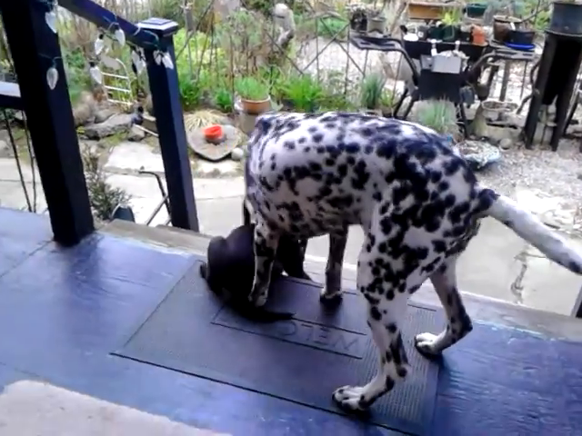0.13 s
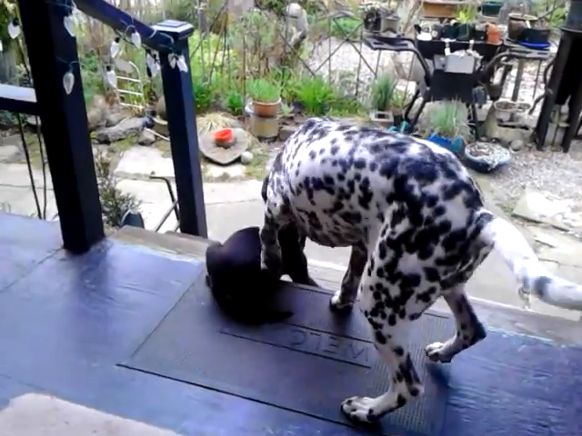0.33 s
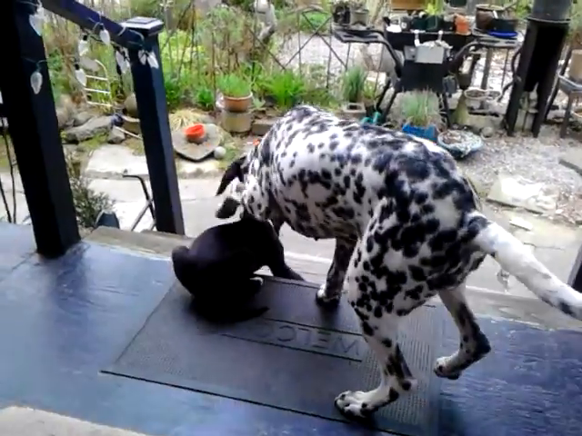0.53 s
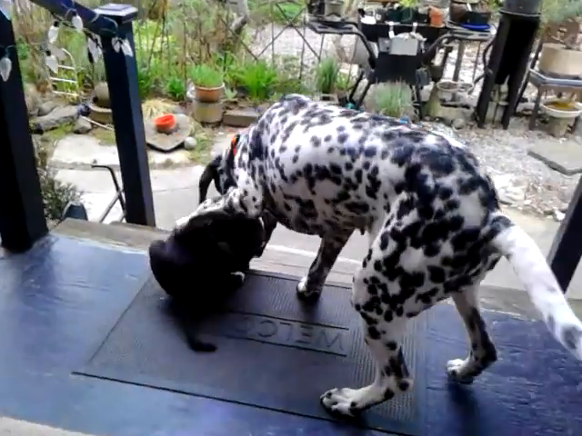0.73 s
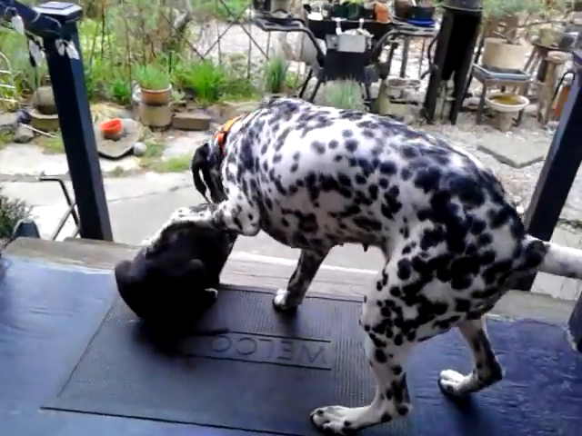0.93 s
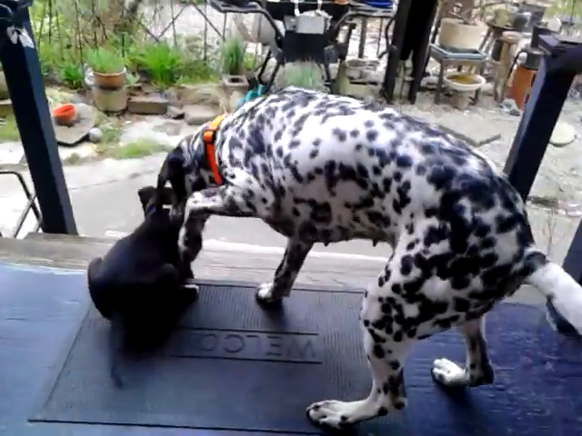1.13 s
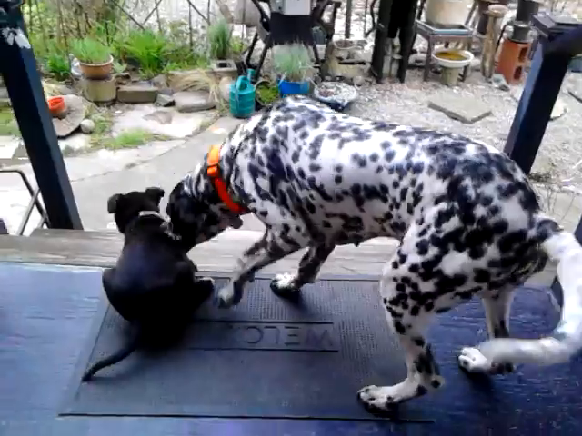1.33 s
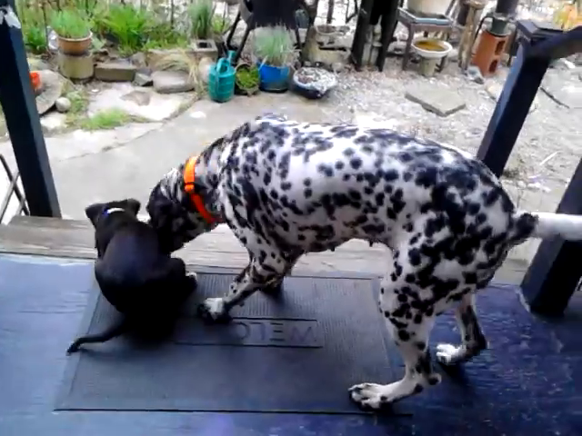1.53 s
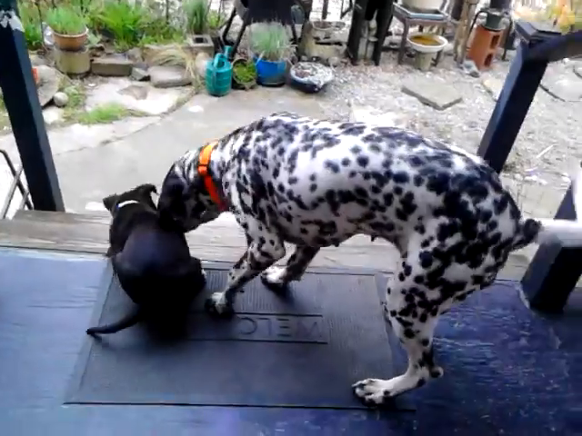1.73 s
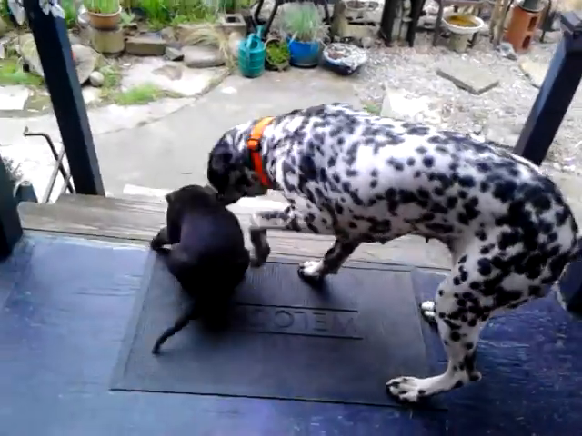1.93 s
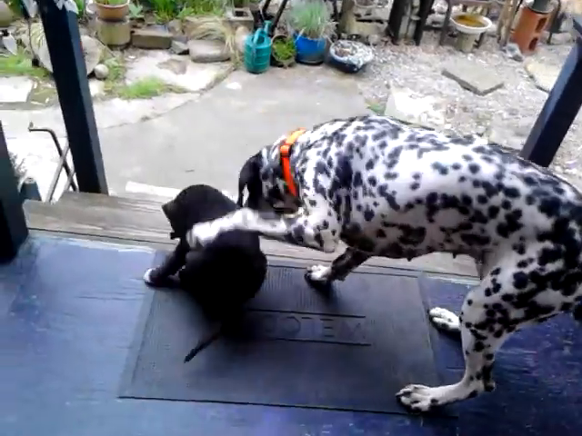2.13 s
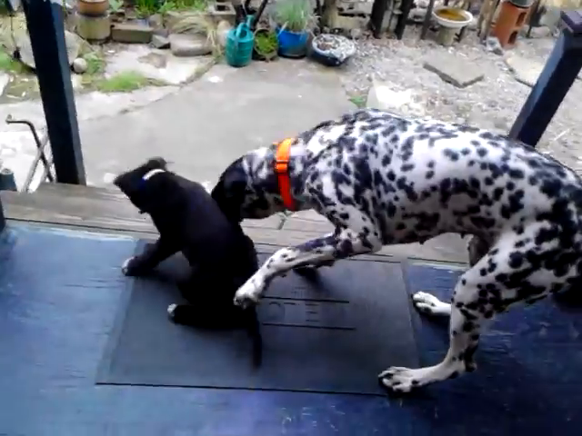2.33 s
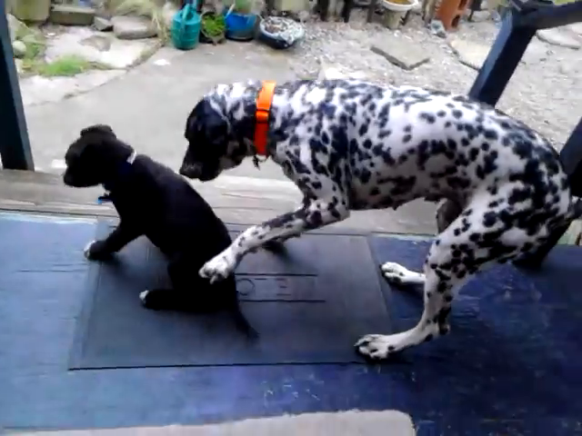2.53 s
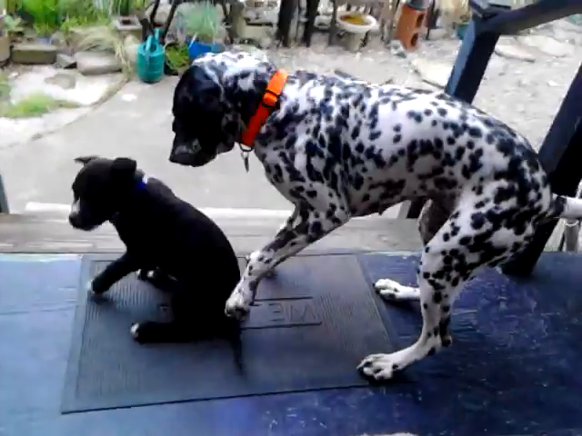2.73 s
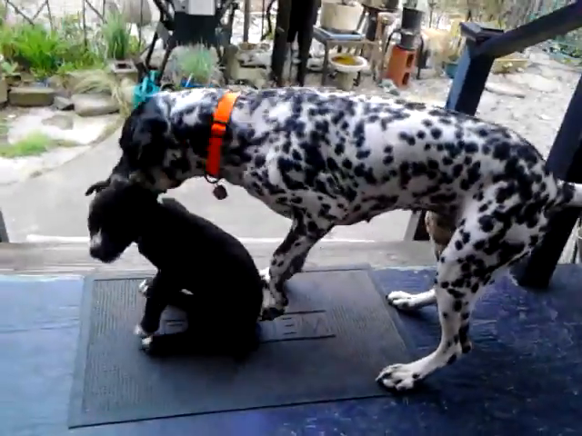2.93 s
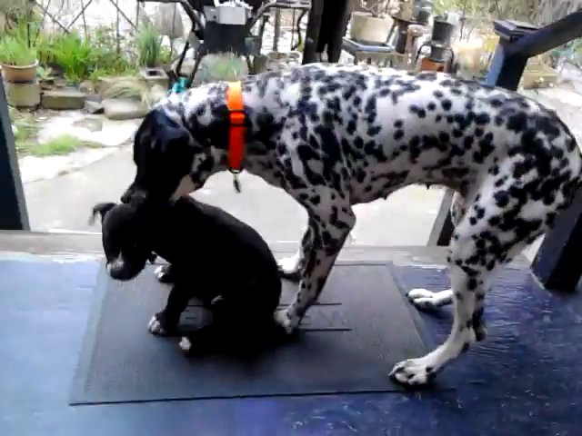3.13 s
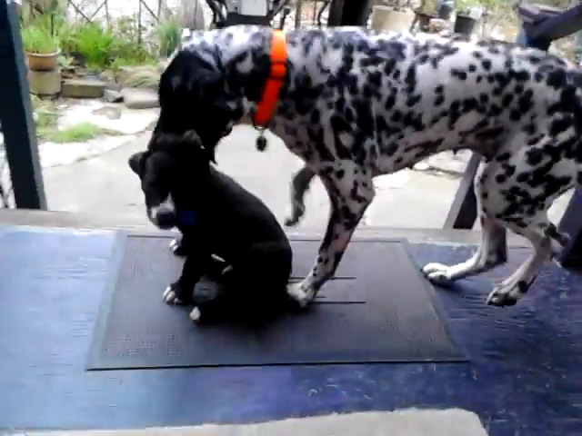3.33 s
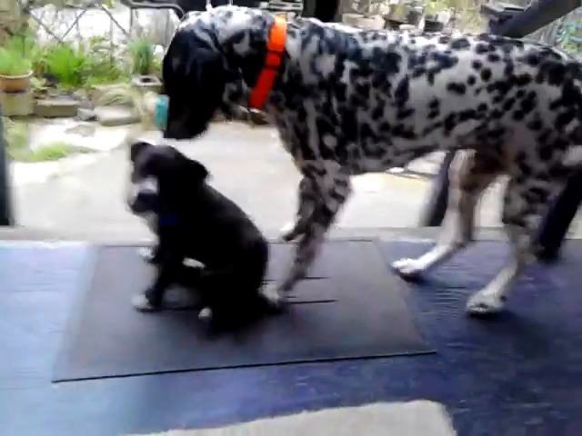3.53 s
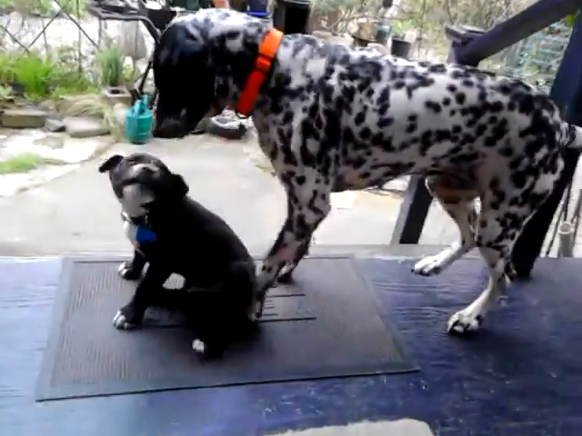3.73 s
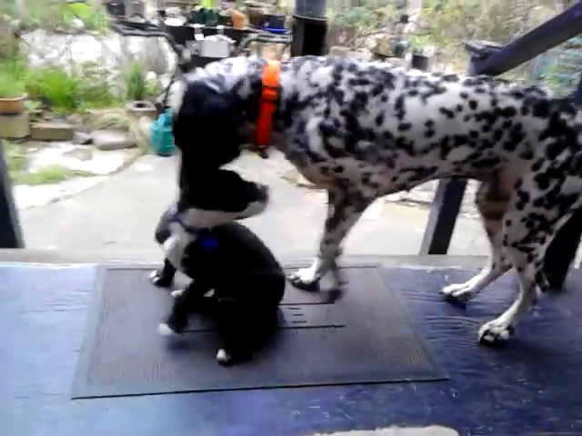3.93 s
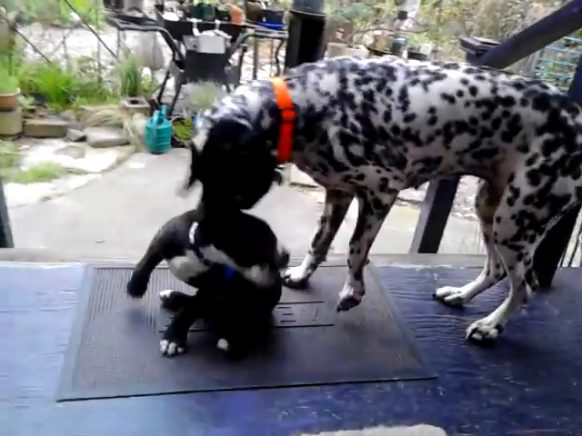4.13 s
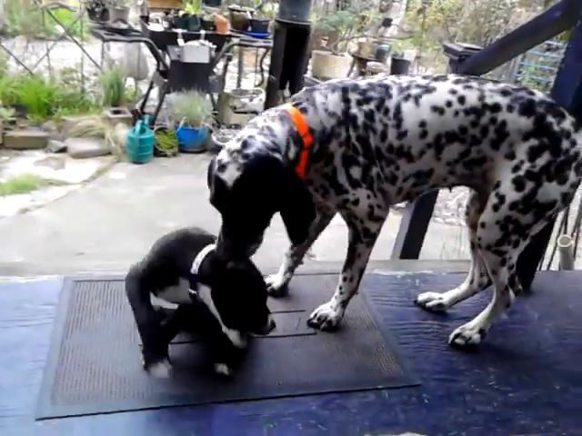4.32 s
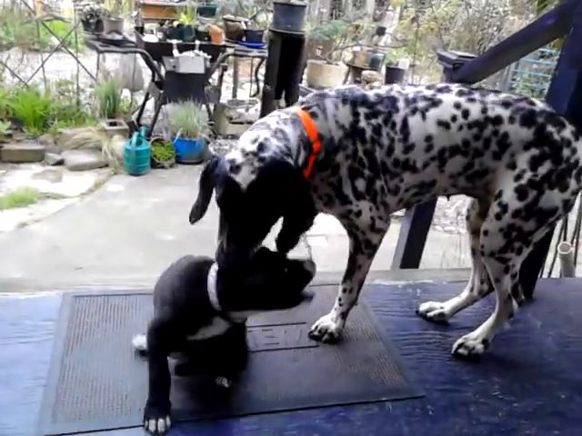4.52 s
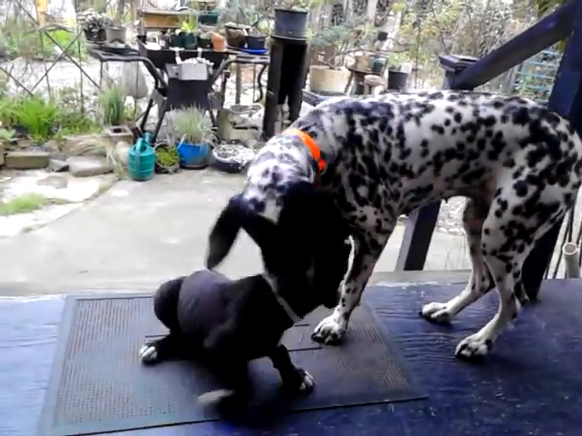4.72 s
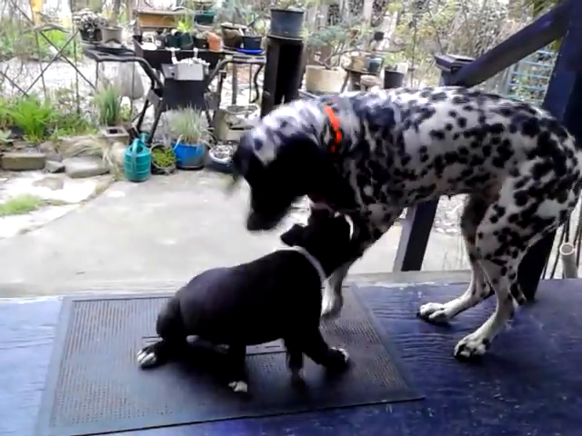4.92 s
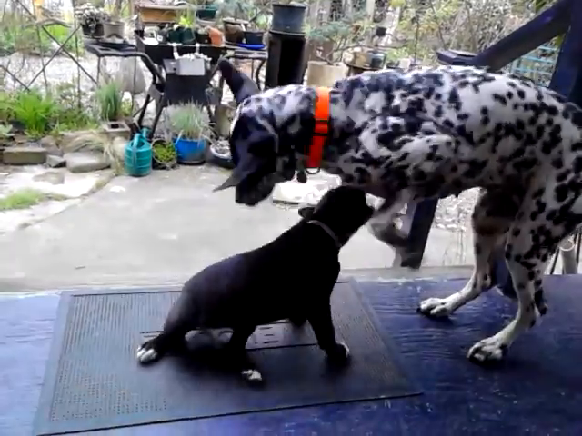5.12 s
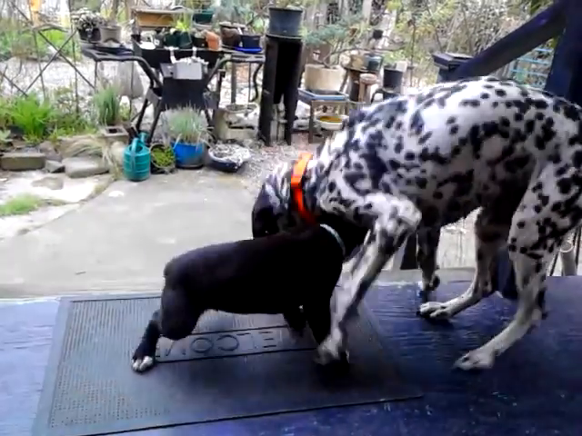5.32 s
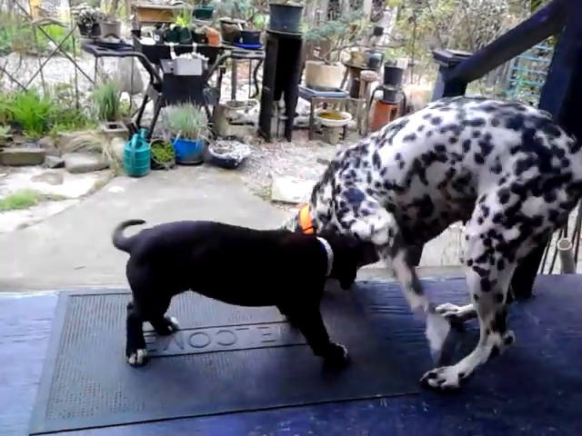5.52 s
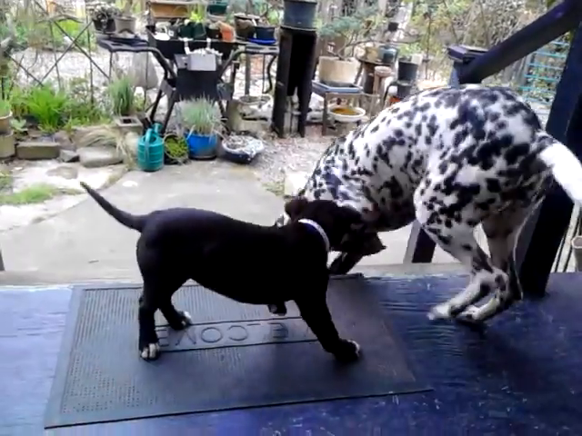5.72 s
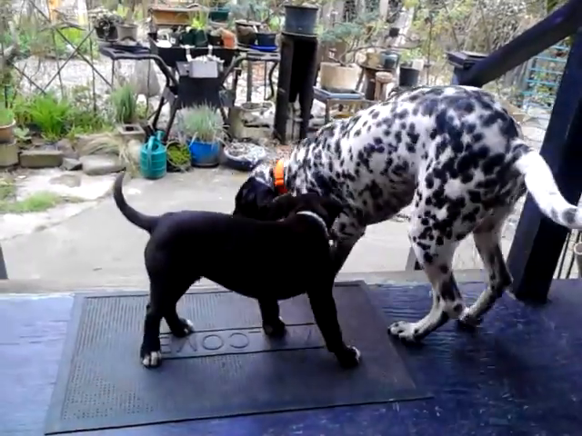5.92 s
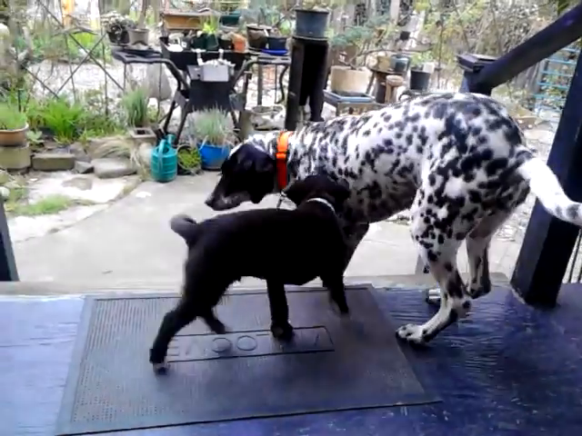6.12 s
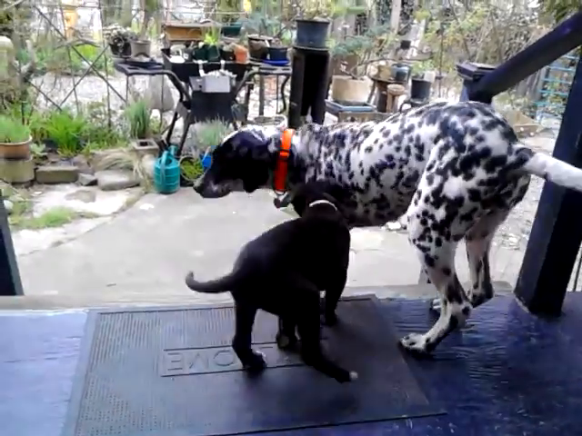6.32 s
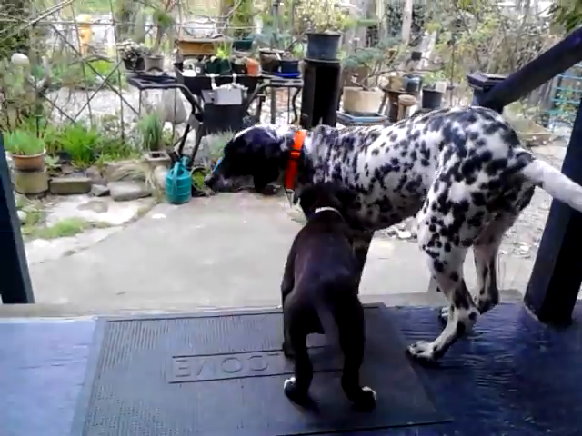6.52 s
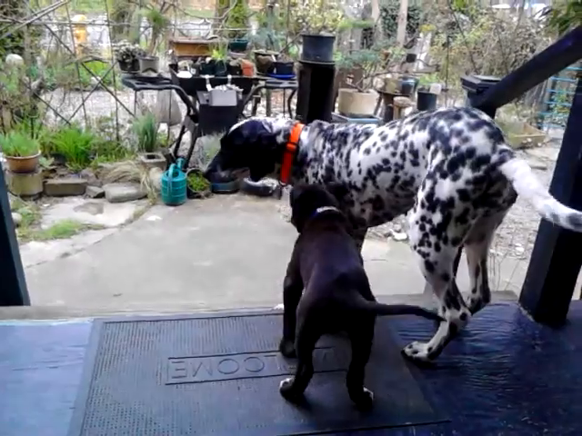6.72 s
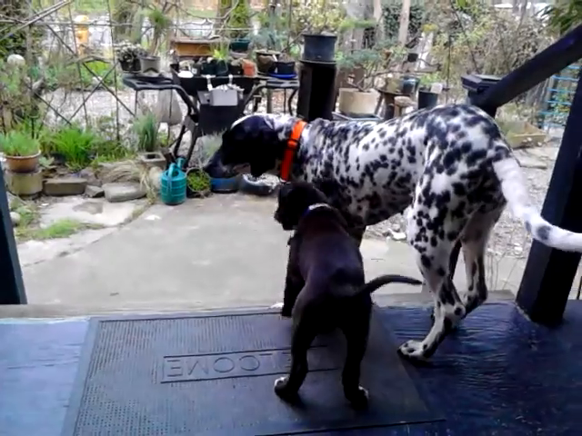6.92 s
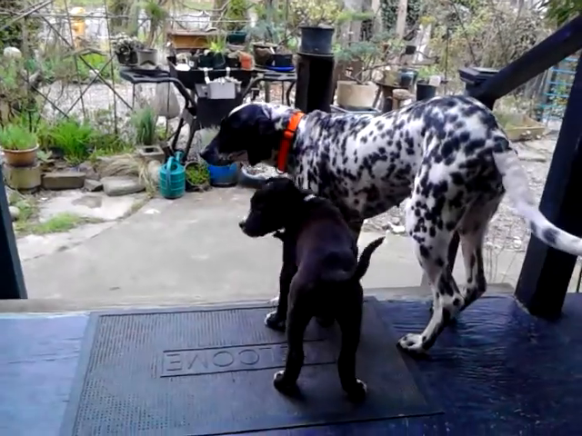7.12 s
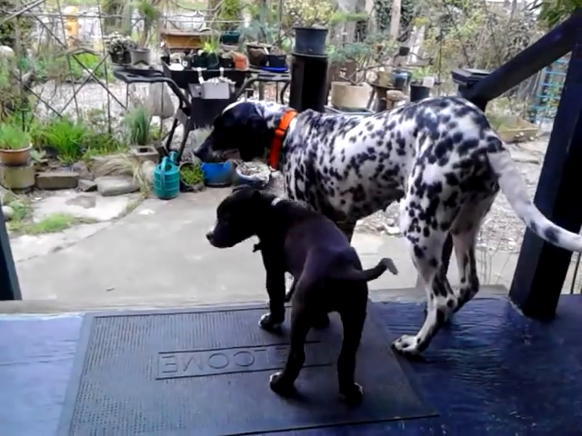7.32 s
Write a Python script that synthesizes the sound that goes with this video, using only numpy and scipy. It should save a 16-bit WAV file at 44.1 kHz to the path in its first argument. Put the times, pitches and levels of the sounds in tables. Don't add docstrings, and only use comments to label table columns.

```python
import sys
import numpy as np
from scipy import signal
from scipy.fft import rfft, irfft, next_fast_len
from scipy.io import wavfile
from scipy.ndimage import uniform_filter1d

SR = 44100
rng = np.random.default_rng(int(sys.argv[2]) if len(sys.argv) > 2 else 0)


def undo_db(level):
    steps = np.asarray(level, float) / 20
    return 10 ** steps


def generate_wav(signal):
    frames = np.transpose(np.atleast_2d(signal))
    scaled = np.clip(frames, -1, 1) * 32767
    pcm = np.round(scaled).astype(np.int16)
    wavfile.write(sys.argv[1], SR, pcm)


N = 325649
T = np.arange(N) / SR

# frequency in Hz, level in dB.
FUR_COLOUR = [(2500, -11.5), (3500, -9), (4500, -3.5), (5200, 0), (5750, 5.5), (6300, -3.5), (7000, -9.5),
              (8500, -22), (12000, -28)]
PASSES_S, SPEED_M_S, ROAD_M, HEDGE_DB_PER_S = 5.283, 13.2, 8.57, -1.4


def level(x, db):
    return x * undo_db(db) / np.sqrt(np.mean(x ** 2))


def peak(x, db):
    return x * undo_db(db) / np.abs(x).max()


def curves(table):
    s, *columns = np.transpose(table)
    return [np.interp(T, s, column) for column in columns]


def colour(x, points):
    hz, db = np.transpose(points)
    size = next_fast_len(N)
    log_hz = np.log(np.arange(size // 2 + 1) * SR / size + 1)
    gain = undo_db(np.interp(log_hz, np.log(hz), db, -90, -90))
    return irfft(rfft(x, size) * gain, size)[:N]


def band(x, lo_hz, hi_hz, order=2):
    edges_hz = [lo_hz, min(hi_hz, SR * .45)]
    return signal.sosfilt(signal.butter(order, edges_hz, "bandpass", fs=SR, output="sos"), x)


def walk(rate):
    hold = int(SR / rate)
    steps = np.repeat(rng.standard_normal(N // hold + 1), hold)
    return 1.295 * uniform_filter1d(uniform_filter1d(steps, hold), hold)[:N]


def add(out, s, sound):
    i = int(s * SR)
    out[i:i + len(sound)] += sound[:N - i]


def ring(hz, db, t60, phase):
    t = T[:int(t60 * SR)]
    attack = np.minimum(t / 0.00026, 1)
    return undo_db(db - 60 * t / t60) * np.sin(2 * np.pi * (hz * t + phase)) * attack


def contact(chance, length, scatter=.42):
    x = scatter * chance * np.exp(-T[:len(chance)] / length)
    x[12] += 2.5
    return x


def tone(table):
    hz, db = curves(table)
    since_start, until_end = T - table[0][0] + .01, table[-1][0] + 0.011 - T
    fade = np.clip(np.minimum(since_start, until_end) / 0.13, 0, 1)
    strength = np.sqrt(2) * fade * undo_db(db + 1.3 * walk(8.8))
    wobbly_hz = hz * (1 + 0.01223 * walk(9.7))
    return strength * np.sin(2 * np.pi * np.cumsum(wobbly_hz) / SR)


def distance_db(late=0):
    t = T - PASSES_S - late
    spread_db = -20 * np.log10(np.hypot(SPEED_M_S * t, ROAD_M) / ROAD_M)
    return spread_db + HEDGE_DB_PER_S * np.maximum(t, 0)


def distant_traffic():
    # frequency in Hz, level in dB.
    air_colour = [(12, 1), (20, -8.5), (65, -4.5), (142, -15), (388, -20), (574, -21), (642, -18),
                  (1370, -19.5), (2080, -24.5), (2990, -38), (4540, -58), (5680, -64), (7520, -35),
                  (14700, -34), (16000, -35)]
    return level(colour(rng.standard_normal(N), air_colour), -56) * undo_db(0.2 * walk(4.0))


def hum():
    # time in seconds, pitch in Hz, level in dB.
    hum_line = [
        (0.0, 41.2, -57.5),
        (7.38, 42.96, -58),
    ]
    return tone(hum_line) * undo_db(1.5 * walk(2.41))


def car():
    # frequency in Hz, level in dB.
    tyre_colour = [(180, -50), (300, -11.5), (402, -8), (634, -10.5), (831, -6.5), (1340, -8), (1760, -6.5),
                   (3150, -22.5), (4000, -22), (5200, -35), (8800, -120)]
    # time in seconds, pitch in Hz, level in dB.
    engine = [
        [(3.3, 96.7, -61), (3.44, 96, -58.5), (3.72, 99.5, -66), (3.9, 106.6, -60.5), (4.49, 107, -46.5),
         (5.01, 105.5, -52.5), (5.14, 102.2, -59.5), (5.7, 96.8, -64), (6.2, 95.6, -66)],
        [(5.4, 68.8, -29), (5.482, 68.3, -59), (5.802, 67, -62.5), (6.392, 67.95, -54.5), (7.252, 68.4, -63.5),
         (7.312, 67.8, -50), (7.38, 68.0, -63)],
    ]
    exhaust_late_s, exhaust_turn_s = 0.026, .12
    behind = .5 + .5 * np.tanh((T - PASSES_S - exhaust_late_s) / exhaust_turn_s)
    noise = rng.standard_normal((3, N))

    roar_db = -42 + distance_db() + .6 * walk(9)
    roar = level(colour(noise[0], tyre_colour), -1.7) * undo_db(roar_db)

    tread_gain = np.hypot(undo_db(-36 + 3.47 * distance_db(-0.073)), behind * undo_db(-58.5))
    tread = level(band(noise[1], 735, 1014), -8) * tread_gain * undo_db(1.2 * walk(18.0))
    note_hz = 850 * (1 - .03 * np.tanh((T - PASSES_S) / .6) + .03 * walk(40))
    note = np.sin(2 * np.pi * np.cumsum(note_hz) / SR)
    tread += tread_gain * undo_db(-17 + 1.7 * walk(16)) * note

    rumble_fall = 1 + (0.53 - 1) * behind
    rumble_db = -52 + rumble_fall * distance_db(exhaust_late_s) + 6.5 * behind
    rumble = level(band(noise[2], 178.0, 284), -2.4) * undo_db(rumble_db + 0.41 * walk(5.5))
    return roar + tread + rumble + sum(tone(part) for part in engine)


def rustle():
    # time in seconds, fur level in dB.
    play = [(0, -63), (.9, -59.5), (1.2, -63), (1.55, -59.5), (1.85, -61.5), (2.3, -58), (3.3, -63),
            (3.45, -57.5), (3.9, -64), (4.45, -55), (5.3, -53.5), (5.47, -55), (5.68, -54), (6.1, -56.5),
            (6.6, -61), (7.38, -63.5)]
    tyre_hiss_db = -54.5 + 2.1 * distance_db()
    strength = np.hypot(undo_db(curves(play)[0]), undo_db(tyre_hiss_db))
    grain_db = 2.3 * np.minimum(rng.exponential(1, N // 64 + 1), 3)
    grains = rng.standard_normal(N) * undo_db(grain_db.repeat(64)[:N])
    return level(colour(grains, FUR_COLOUR), 0) * strength * undo_db(1.7 * walk(25))


def brushes():
    # start in seconds, length in seconds, level in dB, centre in Hz.
    strokes = [(0.368, 0.14, -59, 5500), (0.532, 0.15, -51, 5250), (0.653, 0.11, -55.5, 5530),
               (0.916, 0.25, -54, 5640), (1.635, 0.12, -57, 4900), (2.537, 0.11, -54, 5660),
               (3.243, 0.067, -57, 5330), (4.126, 0.042, -55.5, 5440), (4.502, 0.039, -51, 5500),
               (4.622, 0.1, -50.5, 4760), (5.018, 0.14, -45.5, 5060), (7.1, 0.24, -61.5, 4330)]
    out, noise = np.zeros(N), rng.standard_normal(N)
    for s, length, db, hz in strokes:
        hiss = noise[int(s * SR):int((s + length) * SR)]
        hiss = level(band(hiss, hz - 700, hz + 700), 0) + level(band(hiss, 1300, 4040), -5.5)
        add(out, s, hiss * undo_db(db) * np.hanning(len(hiss)))
    return out


def paws():
    # start in seconds, level in dB, pitch in Hz, time to fall 60 dB in seconds.
    thuds = [
        (5.19, -41, 210, .2),
        (5.02, -45, 210, .15),
        (.595, -45, 330, .09),
        (5.335, -35, 213, .5),
        (5.57, -42, 115, .4),
        (5.592, -31, 410, .13),
        (5.594, -35, 1350, .1),
    ]
    out = np.zeros(N)
    for s, db, hz, t60 in thuds:
        swell = np.minimum(T[:int(t60 * SR)] / (.12 * t60), 1)
        add(out, s, ring(hz, db, t60, 0) * swell)
    return out


def knocks():
    # start in seconds, peak in dB, pitch in Hz.
    planks = [(0.0557, -47, 2220), (0.0851, -45, 2350), (0.1011, -38, 1760), (0.3909, -47, 1700),
              (0.3949, -44.5, 2150), (0.8454, -42, 2130), (1.4062, -29, 2000), (1.4723, -35, 2150),
              (1.4824, -44, 2150), (1.5652, -44, 1610), (1.7997, -40, 2000), (2.1504, -44, 2500),
              (2.3365, -42, 2520), (2.3511, -44, 1700), (2.4106, -48, 1310), (2.7937, -39.5, 1500),
              (3.0665, -42, 1580), (3.4488, -36, 1990), (3.6022, -40.5, 1680), (3.6094, -36.5, 1720),
              (4.4454, -36.5, 1410), (4.611, -44, 1530), (4.6792, -32.5, 1837), (4.802, -36, 1770),
              (5.3168, -34, 1837), (5.4011, -31, 2230), (5.5872, -34, 1660), (5.597, -43, 1350),
              (5.693, -33.5, 2240), (5.887, -36.5, 2110), (6.114, -25.5, 3060), (6.5261, -46, 1200)]
    out, width = np.zeros(N), 0.17
    for (s, db, hz), chance in zip(planks, rng.standard_normal((len(planks), 700))):
        touch = contact(chance, 0.0049, scatter=0.24)
        note = band(touch, hz * (1 - width), hz * (1 + width))
        add(out, s, peak(note, db + 1) + peak(band(touch, 530, 1400), db - 7))
    return out


def links():
    # start in seconds, peak in dB, centre in Hz.
    ticks = [(0.2174, -44, 11300), (0.5344, -51, 11000), (0.6419, -53, 10100), (0.9453, -37.5, 11800),
             (1.4132, -35, 8810), (2.2154, -47, 11000), (4.717, -47, 8200), (5.1342, -39, 10300),
             (5.2157, -33.5, 10700), (5.245, -31, 11040), (5.655, -33.5, 8800), (6.1943, -46, 11200),
             (6.8215, -43, 11200), (6.9072, -41, 13050), (6.945, -55, 11440), (7.2479, -45, 14100)]
    out = np.zeros(N)
    for (s, db, hz), chance in zip(ticks, rng.standard_normal((len(ticks), 300))):
        touch = contact(chance, 0.0064, scatter=0.72)
        add(out, s, peak(band(touch, hz * 0.34, hz * 1.37), db - 1.0))
    return out


def tags():
    # start in seconds, then the level of each of its pitches in dB.
    hits_a = [(.177, -58, -75, -75), (.2024, -45, -49, -53), (.5217, -40, -55, -70), (.9244, -46, -72, -68),
              (1.4155, -35, -53, -68), (1.5065, -57, -42, -70), (2.2253, -49, -52, -72),
              (2.346, -46, -52, -72), (2.966, -47, -33, -72), (3.028, -44, -34, -61),
              (3.062, -34, -40, -70), (3.5034, -45, -72, -72), (3.844, -53, -57, -75),
              (5.215, -42, -38, -54), (5.2455, -16, -32, -51), (5.281, -38, -60, -70),
              (5.335, -45, -60, -70), (5.387, -39, -47, -74), (5.657, -60, -70, -44),
              (5.6864, -41, -56, -66), (5.6965, -33, -34, -60), (5.7015, -23, -31, -55),
              (5.748, -44, -57, -70), (6.73, -72, -51, -72)]
    hits_b = [(.0992, -45, -57, -48, -39), (.81, -57, -64, -62, -42), (.823, -66, -70, -70, -53),
              (1.4985, -47, -54, -55, -72), (2.323, -51, -72, -60, -66), (2.6055, -68, -55, -64, -74),
              (3.8327, -57, -72, -50, -48), (4.64, -72, -49, -67, -64), (5.1544, -72, -55, -64, -70),
              (5.2644, -34, -66, -35, -46), (5.2844, -60, -56, -41, -60), (6.379, -61, -53, -52, -71),
              (6.909, -74, -58, -66, -72), (7.35, -66, -70, -64, -74)]
    # pitch in Hz, level in dB added to every strike of that pitch.
    modes_a = [(7850, -8), (10910, -8), (12070, -6)]
    modes_b = [(14780, -9), (12965, -7), (12280, -8), (4765, -2)]
    # start in seconds, level in dB, pitch in Hz, time to fall 60 dB in seconds.
    collar = [
        (3.834, -53, 4300, .28),
        (1.555, -51, 3500, .05),
        (1.766, -50, 3800, .04),
        (3.028, -36, 4150, .035),
    ]
    out = np.zeros(N)
    for hits, modes, t60 in ((hits_a, modes_a, 0.085), (hits_b, modes_b, .13)):
        for (s, *mode_db), phases in zip(hits, rng.random((len(hits), 4))):
            for (hz, out_db), db, phase in zip(modes, mode_db, phases):
                add(out, s, ring(hz, db + out_db, t60, phase))
    for s, db, hz, t60 in collar:
        add(out, s, ring(hz, db, t60, 0))
    flutter_db = 3.5 * walk(90) + 3.5 * walk(330) - 4
    return out * undo_db(flutter_db)


def scrapes():
    # start in seconds, length in seconds, level in dB, fizz against it in dB, catches per second.
    drags = [(0.519, 0.024, -70, 9, 660), (1.312, 0.094, -59.5, -9, 2700), (1.466, 0.032, -57, -20, 780),
             (2.148, 0.043, -62.5, -26, 1300), (2.784, 0.035, -63.5, -11, 1900),
             (3.012, 0.065, -58.5, -12, 440), (3.598, 0.027, -61.5, -32, 850),
             (4.293, 0.032, -54, -39, 3500), (5.242, 0.061, -48.5, -20, 1200),
             (5.295, 0.06, -48.5, -22, 790), (5.413, 0.025, -46.5, -15, 490), (5.488, 0.055, -52, -6, 770),
             (5.583, 0.046, -52.5, -33, 1400), (5.689, 0.029, -55, 0.5, 920), (6.12, 0.02, -56, -30, 900),
             (5.492, 0.059, -60, -10, 900), (6.524, 0.037, -60, -35, 1300)]
    body, fizz = np.zeros(N), np.zeros(N)
    chance, noise = rng.random((2, N)), rng.standard_normal(N)
    for s, length, db, fizz_db, rate in drags:
        i = slice(int(s * SR), int((s + length) * SR))
        catch_size = undo_db(-1.8 * np.log(chance[1, i]))
        catches = (chance[0, i] < rate / SR) * catch_size
        grit = noise[i] * (.7 + signal.lfilter([1], [1, -.96], catches))
        grit = level(grit, db) * signal.windows.tukey(len(grit), .45)
        body[i] += grit
        fizz[i] += grit * undo_db(fizz_db)
    low_edge = band(body, 4100, 4140) * undo_db(-1)
    return colour(body, FUR_COLOUR) * undo_db(20.0) + low_edge + band(fizz, 4600, 16400) * undo_db(6.5)


def claws():
    # start in seconds, peak in dB, strongest ring in Hz, board knock against the peak in dB.
    on_boards = [(0.057, -39.5, 5530, -13), (0.1007, -43, 4940, 0), (0.5277, -30, 5970, -28),
                 (0.5215, -37, 5870, -25), (2.353, -37, 5700, -13), (5.2765, -19, 5300, -9),
                 (5.3175, -33, 5800, -15), (1.4835, -36, 5670, -15), (5.537, -28, 5600, -11),
                 (5.7012, -34, 5500, -18), (1.355, -31, 6270, -22), (1.4735, -42, 5700, -2),
                 (1.4995, -34, 5800, -21), (1.799, -39, 5600, -9), (2.15, -37, 6000, -14),
                 (2.1582, -33, 5600, -12), (3.2615, -39, 5600, -13), (3.542, -40, 5540, -14),
                 (3.5898, -41, 5140, -17), (3.6027, -31, 5100, -2), (3.797, -35, 5560, -9),
                 (4.1018, -35, 5430, -19), (4.1924, -39, 5490, -17), (4.3097, -27, 5670, -14),
                 (4.318, -29, 5640, -15), (4.208, -39, 5600, -20), (5.424, -22, 5400, -25),
                 (4.3006, -34, 5700, -9), (4.369, -30, 5570, -15), (4.3845, -28, 5460, -28),
                 (4.467, -31, 5500, -24), (4.6807, -25.5, 5660, -18), (5.079, -27, 5540, 1),
                 (5.3995, -23, 5600, -19), (5.51, -30, 5800, -19), (5.5238, -31, 5370, -18),
                 (6.639, -38.5, 5650, -5), (6.812, -37, 5560, -17), (7.1186, -36.5, 5500, -22)]
    on_mat = [(0.8459, -20, 6130, -27), (1.4068, -22, 5750, -12), (2.926, -43, 5000, -20),
              (6.06, -41, 5700, -20), (1.5543, -37, 3620, -16), (1.6185, -44, 3800, -17),
              (1.764, -31.5, 3960, -23), (2.338, -30.5, 5930, -7), (2.385, -48, 6100, -6),
              (0.264, -49, 3850, -25), (1.5668, -39, 5600, -14), (2.6959, -27.5, 5630, -13),
              (2.79, -43, 6030, 0), (3.3598, -38, 5900, -9), (4.2602, -33, 4300, -4),
              (5.0138, -28.5, 5470, -15), (5.0309, -24, 5200, -13), (5.047, -27.5, 5200, -18),
              (5.254, -10, 5400, -28), (0.395, -42, 5740, -12), (0.674, -48, 3930, -15),
              (5.291, -29, 5220, -14), (5.5859, -21, 5400, -4), (5.7017, -31, 5490, -17),
              (5.892, -30, 5300, -10), (6.1143, -12, 4800, -11), (6.1178, -14, 5000, -18),
              (6.5291, -30, 5470, -10.5)]
    # the same columns, then the sharp edge against the peak in dB.
    on_tips = [(0.086, -45, 3120, -1, -14), (0.202, -41, 5880, -24, 7.5), (0.8472, -17, 5470, -34, -14),
               (1.3285, -34, 5600, -25, -7), (0.916, -41, 5670, -18, 5), (2.4111, -24.5, 5800, 2, -32),
               (2.9655, -35, 5900, -26, 8), (3.0275, -20, 4060, -33, -10), (3.061, -30.5, 5700, -16, 3.5),
               (3.4507, -9, 5730, -32, -18.5), (3.832, -35.5, 4820, -22, -6), (5.4015, -19, 5650, -21, -12),
               (5.4204, -7, 5580, -30, -16), (5.509, -21, 4870, -26, -21), (5.6973, -38, 5780, -6, -12),
               (6.729, -41, 5520, -16.5, -17), (6.7895, -38.5, 5540, -21, -14),
               (6.989, -43, 6000, -13, -19), (7.0904, -40, 5730, -17, -8), (7.3497, -41, 5360, -19, -1)]
    # mat tap in dB, sharp edge in dB, ring width as a share of pitch (rubber damps it)
    touches = [(*row, -20, -39, .085) for row in on_boards]
    touches += [(*row, -11, -34, .19) for row in on_mat]
    touches += [(*row, -12, edge_db, .085) for *row, edge_db in on_tips]
    out = np.zeros(N)
    chances = rng.standard_normal((len(touches), 400))
    for (s, db, hz, knock_db, tap_db, edge_db, width), chance in zip(touches, chances):
        touch = contact(chance, .0012)
        claw = band(touch, (1 - width) * hz, (1 + width) * hz, order=3)
        board = band(touch, 1500, 2800)
        mat = np.roll(band(touch, 3550, 4400), 9)
        tip = band(touch, 7100, 8700)
        edge = -band(touch, 8700, 15000)
        sound = peak(claw, -1.75) + peak(board, knock_db - 10) + -peak(mat, tap_db - 2)
        sound += peak(tip, 0.31 * edge_db - 13.5) + peak(edge, edge_db - 3.0)
        add(out, s, undo_db(db) * sound)
    return out


def porch(x):
    # delay in seconds, level in dB.
    wall = [
        (.0088, -12.5),
    ]
    t = T[:int(.3 * SR)]
    echo = rng.standard_normal(len(t)) * undo_db(-60 * t / 0.14) * np.minimum(t / .012, 1)
    echo = echo / np.sqrt(np.sum(echo ** 2)) * undo_db(-7.5)
    for s, db in wall:
        add(echo, s, undo_db([db]))
    wet = signal.fftconvolve(x, echo)[:N]
    return x + colour(wet, [(800, 4.0), (3000, 0.5), (4600, -5.0), (5700, -4.0), (7000, -4.5), (16500, -4)])


def scene():
    hard_sounds = claws() + paws() + links() + scrapes() + tags() + knocks()
    dogs = porch(hard_sounds) + brushes() + rustle()
    return (dogs + car() + hum() + distant_traffic())[None]


def low_pass(x):
    return signal.sosfilt(signal.butter(12, 16830, fs=SR, output="sos"), x)


def record(dry):
    dull = signal.sosfilt(signal.ellip(8, .3, 40, 15900, fs=SR, output="sos"), dry)
    return low_pass(dull - .0039)


dry = scene()
out = record(dry)
generate_wav(out)
```